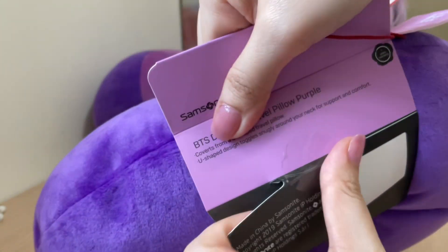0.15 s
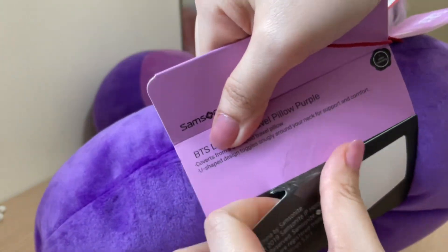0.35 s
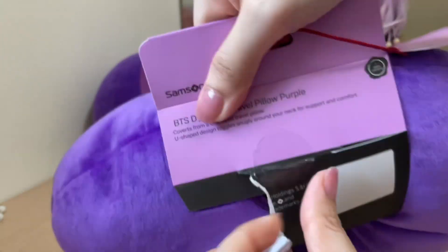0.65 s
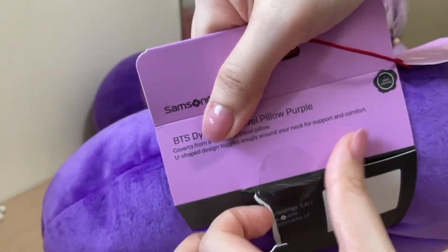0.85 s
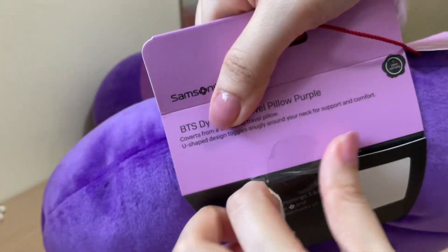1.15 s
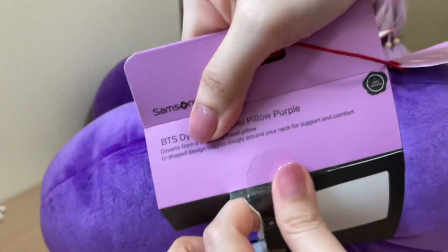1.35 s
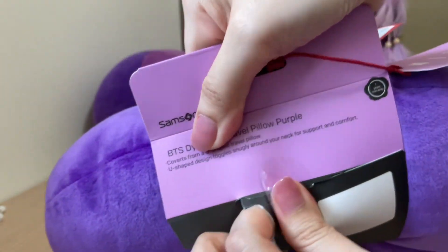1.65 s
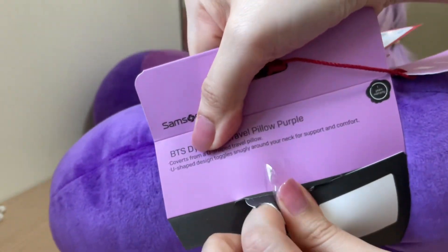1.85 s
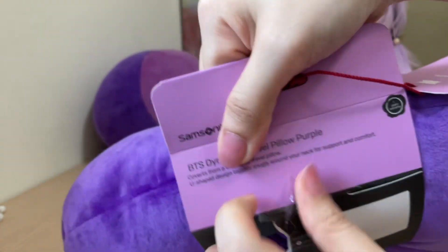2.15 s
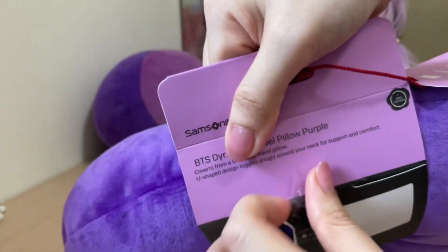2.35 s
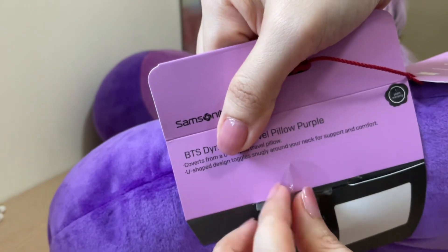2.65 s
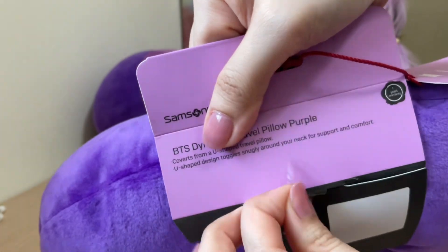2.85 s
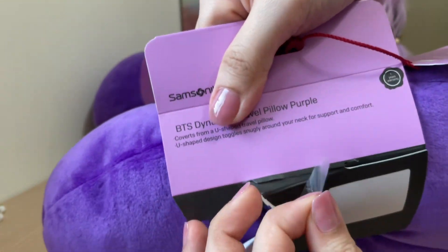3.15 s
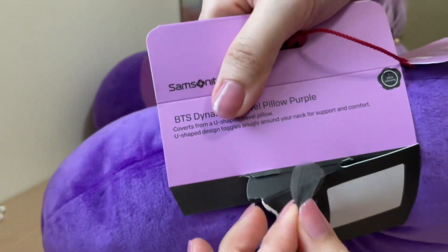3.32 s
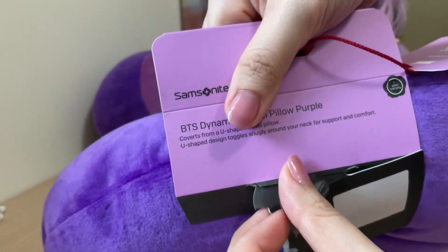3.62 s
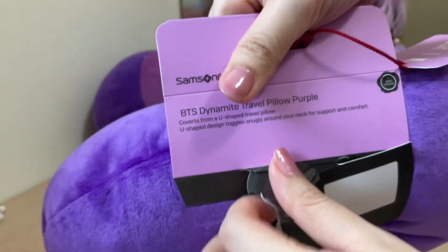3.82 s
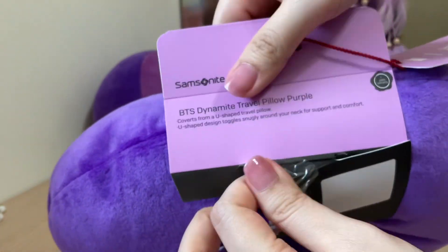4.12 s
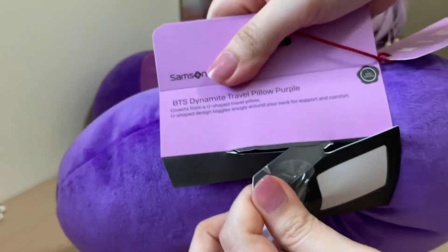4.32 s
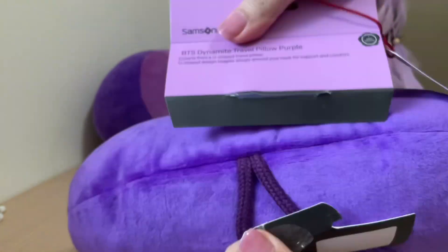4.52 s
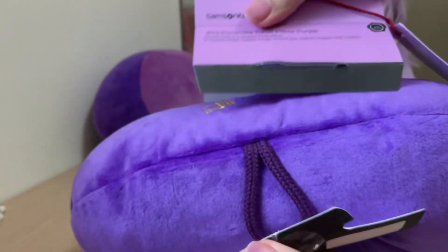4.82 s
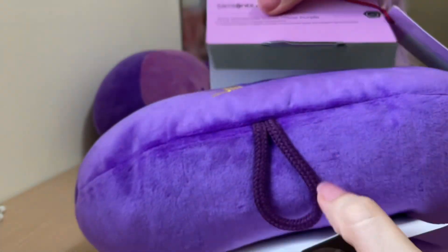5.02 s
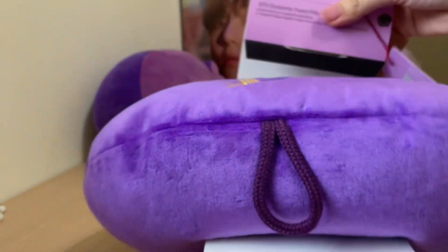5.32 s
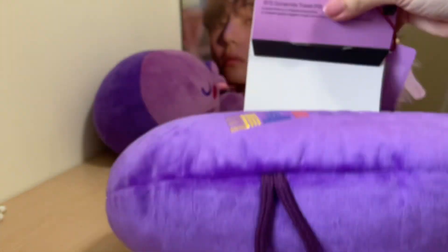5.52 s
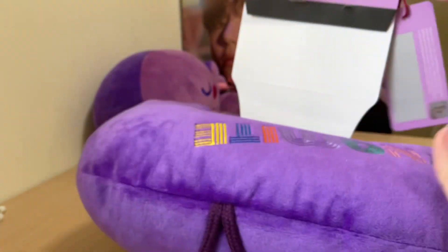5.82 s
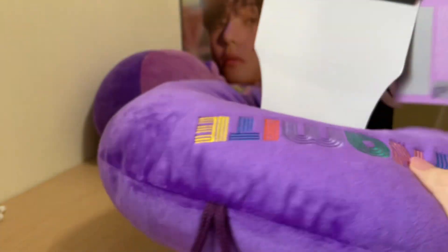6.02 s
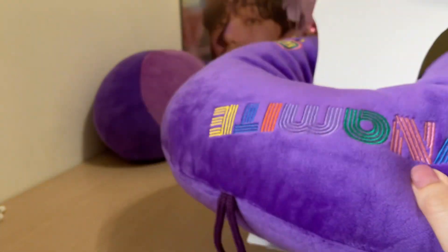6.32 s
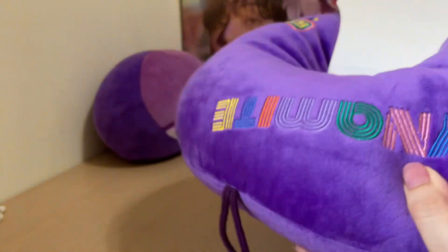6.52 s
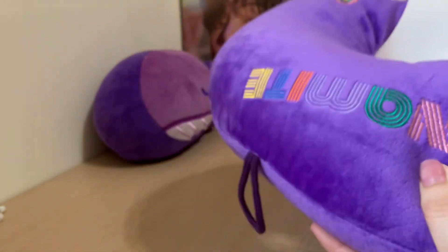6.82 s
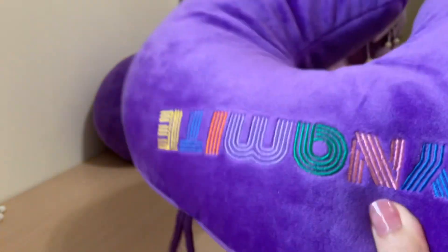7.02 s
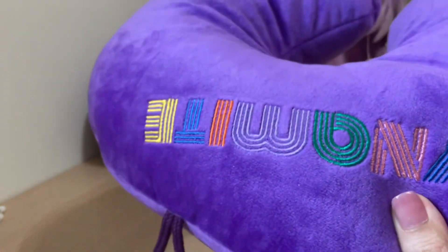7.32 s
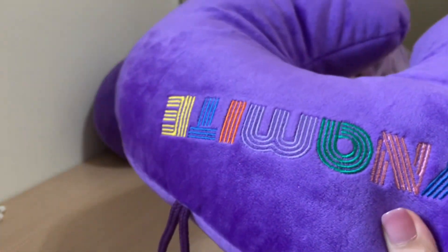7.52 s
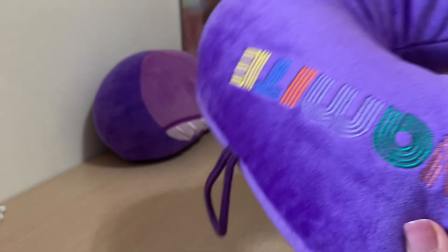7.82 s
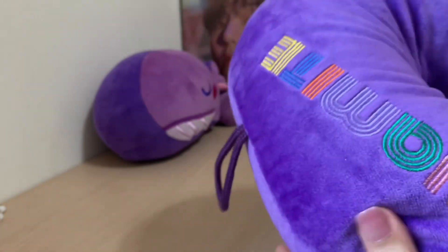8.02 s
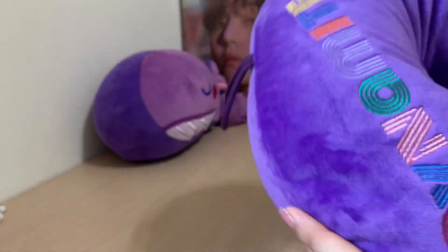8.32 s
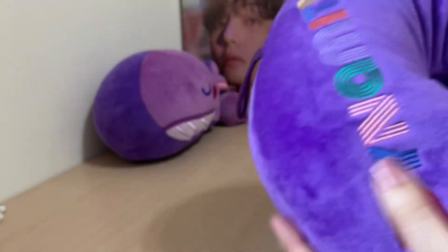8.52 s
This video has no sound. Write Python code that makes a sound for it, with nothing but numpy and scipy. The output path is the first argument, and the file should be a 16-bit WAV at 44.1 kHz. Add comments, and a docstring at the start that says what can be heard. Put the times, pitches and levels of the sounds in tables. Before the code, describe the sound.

Bright, dry crackling of glue letting go from stiff card, heard close to a phone microphone indoors. Irregular clicks and finger scuffs fill the first half, ending in a strong snap with a papery thump. Card clacks and scrapes briefly, then smoother plush rubbing takes over. A short, low desk knock comes late, followed by gentle brushing over faint room hum.

```python
"""A low room murmur and faint rubbing are heard first, then fingers pick clear tape off a cardboard tag.
Glue lets go in snaps (filtered impulses with fibre noise and a falling bending wave) and short rips
(dense random slips). The tag slides off a plush pillow, the fabric rubs (coloured friction grains),
and the tag drops with a knock on the desk (damped modes). A phone is close by in a small quiet room."""
import sys
import numpy as np
from scipy import signal
from scipy.fft import rfft, irfft
from scipy.io import wavfile

SR = 44100
rng = np.random.default_rng(int(sys.argv[2]) if len(sys.argv) > 2 else 0)


def master(y):
    """Save y as 16-bit WAV."""
    cut = np.clip(np.atleast_2d(y).T, -1, 1)
    pcm = np.round(cut * 32767)  # scale
    wavfile.write(sys.argv[1], SR, pcm.astype(np.int16))


N = 381906
MS = SR // 1000  # samples in about a millisecond
TIME = np.arange(N) / SR


def undb(db):
    """Logarithmic level: decibels become an amplitude gain."""
    return 10 ** (np.asarray(db) / 20)


def unit(x):
    """Normalization: scale a signal to rms 1."""
    return x / np.sqrt(np.mean(x ** 2))


def fade(t, t60):
    """Exponential decay: the amplitude loses 60 dB in t60 seconds."""
    return np.exp(-np.log(1000) * t / t60)


def response(points, size=512):
    """Minimum phase: the causal impulse response of a spectrum (f/Hz, level/dB), by its folded cepstrum."""
    hz, db = np.transpose(points)
    f = np.maximum(np.fft.rfftfreq(2 * size, 1 / SR), 1)
    level = np.interp(np.log(f), np.log(hz), db)
    cepstrum = irfft(np.log(undb(level)))
    cepstrum[1:size] *= 2
    cepstrum[size + 1:] = 0
    return irfft(np.exp(rfft(cepstrum)))[:size]


def colour(x, points, size=512):
    """Linear filtering: convolve with the response of a spectrum (f/Hz, level/dB)."""
    return signal.fftconvolve(x, response(points, size=size))[:len(x)]


def low_pass(x, order, hz):
    """Butterworth low-pass: keep what lies below hz."""
    return signal.lfilter(*signal.butter(order, hz, fs=SR), x)


def high_pass(x, order, hz):
    """Butterworth high-pass: keep what lies above hz."""
    return signal.lfilter(*signal.butter(order, hz, "high", fs=SR), x)


def resonance(x, hz, width_hz):
    """Resonance: a band-pass of gain 1 at its centre, with Q = centre / width."""
    return signal.lfilter(*signal.iirpeak(hz, hz / width_hz, fs=SR), x)


def add(out, s, x):
    """Superposition: mix x into out from time s."""
    i = max(int(s * SR), 0)
    out[i:i + len(x)] += x[:max(len(out) - i, 0)]


def walk(rate):
    """Slow random modulation: lines join normal draws, rate of them per second; spread near 1."""
    return np.interp(TIME * rate, np.arange(4096), rng.standard_normal(4096))


def grains(rate, spread_db):
    """Shot noise: tiny slips at random times and of random size, rate per second; rms 1."""
    size = undb(spread_db * np.minimum(rng.exponential(size=N), 4))
    slipping = rng.random(N) < rate / SR
    return unit(slipping * size * rng.standard_normal(N))


def swell(t, peak_s, rise_s, fall_s):
    """Amplitude envelope: builds to its peak and dies away, 20 dB down at the rise and fall times."""
    before = (peak_s - t) / abs(rise_s)
    after = (t - peak_s) / abs(fall_s)
    return undb(-20 * np.maximum(before, after) ** 1.15)


def wander(x, splits_hz, sway=1):
    """Band modulation: as the contact patch shifts, each band between the splits sways by itself."""
    lows = [signal.sosfiltfilt(signal.butter(4, hz, fs=SR, output="sos"), x) for hz in splits_hz]
    below = [0] + lows + [x]
    return sum((high - low) * undb(3.2 * sway * walk(28)) for low, high in zip(below, below[1:]))


def ring(hz, t60, contact_s, sag=0):
    """Damped mode: swells during the contact, sags in pitch (octaves per s), radiates little below it."""
    t = TIME[:SR]
    envelope = fade(t, t60) * np.sin(np.pi / 2 * np.minimum(t / contact_s, 1)) ** 2
    phase = 2 * np.pi * np.cumsum(hz * 2 ** (-sag * t)) / SR
    swing = np.sqrt(2) * envelope / envelope.max() * np.sin(phase)
    return high_pass(swing, 2, hz / 3)


# spectrum of the room air: f/Hz, level/dB
AIR_SPECTRUM = [(25, -66), (45, 2.5), (65, -6.5), (85, 4), (130, 0.5), (250, -4), (370, -3), (520, -5),
                (640, -11.5), (1000, -18), (2000, -24.5), (4000, -42.5), (9000, -49), (16000, -63)]
# low room resonances in the air: f/Hz, width/Hz, level/dB
AIR_RESONANCES = [(99, 12, -7), (181.1, 5.8, -0.5), (259.9, 7.4, 2), (319, 7.1, -12), (415, 6, -3.5),
                  (480.4, 8.9, 0.5)]
AIR_DB, AIR_MODES_DB = -57, -59.5


def air(side_db=-12, side_hz=600):
    """Modal filtering of noise: ventilation murmur gathers in room resonances, almost alike at both ports."""
    mid, side = (unit(colour(rng.standard_normal(N), AIR_SPECTRUM, size=4096)) for _ in range(2))
    noise = rng.standard_normal(N)
    modes = sum(undb(db) * unit(resonance(noise, hz, width)) for hz, width, db in AIR_RESONANCES)
    side = unit(high_pass(side, 1, side_hz)) * undb(side_db)
    murmur = mid + side * np.array([[1], [-1]])
    return undb(AIR_DB) * murmur + undb(AIR_MODES_DB) * unit(modes)


# spectrum of the room's answer: f/Hz, level/dB
WALL_SPECTRUM = [(80, -11.5), (300, -9.5), (1000, -6), (2500, -15.5), (5000, -15.5), (9000, -11.5),
                 (16000, -12)]
ROOM_LOW_T60, ROOM_HIGH_T60 = 0.23, 0.12  # s, bass and treble


def room(x, onset_s=0.002, blend_hz=450):
    """Diffuse reverberation: a short decaying noise tail, its bass shared by both ports, its treble not."""
    t = TIME[:SR // 2]
    shared, left, right = rng.standard_normal((3, len(t)))

    def tail(noise, t60):
        return unit(noise * fade(t, t60) * (t > onset_s)) / np.sqrt(len(t))

    low = low_pass(tail(shared, ROOM_LOW_T60), 2, blend_hz)
    highs = [high_pass(tail(noise, ROOM_HIGH_T60), 2, blend_hz) for noise in (left, right)]
    return np.array([signal.fftconvolve(x, colour(low + high, WALL_SPECTRUM))[:N] for high in highs])


# spectral balance, left port minus right port: f/Hz, level/dB
PORT_BALANCE = [(380, -1.5), (700, 1), (1300, 6), (2400, -2.5), (4400, 3), (8100, -2.5), (15000, -0.5)]


def ports(x, turn_hz=3450, turn_width_hz=1900):
    """Resonant phase shift: two microphone ports differ in colour, and the left one's resonance turns phase."""
    left, right = (colour(x, [(hz, sign * db / 2) for hz, db in PORT_BALANCE]) for sign in (1, -1))
    left = left - 2 * resonance(left, turn_hz, turn_width_hz)  # all-pass
    return np.array([left, right])


def reflected(x, left_s=0.001036, right_s=0.001306, echo_db=-12):
    """Early reflection: the hands throw back an echo whose lag at each port shifts as they move."""
    lags = [lag * (1 + .25 * walk(5)) for lag in (left_s, right_s)]
    echo = np.array([np.interp(TIME - lag, TIME, side) for side, lag in zip(x, lags)])
    return x + undb(echo_db) * echo


def turning(x, sway_db=0.81):
    """Directivity: the card turns in the hands and throws its sound a little left or right."""
    return x * undb(sway_db * walk(11) * np.array([[1], [-1]]))


# desk top modes: f/Hz, t60/s, level/dB
DESK_MODES = [(267.6, 0.15, -5.5), (373, 0.021, 5), (417, 0.18, -6), (525, 0.18, -14), (590, 0.035, -11),
              (726, 0.12, -15), (843, 0.18, -24), (1900, 0.055, -16)]
# knocks of the tag on the desk: t/s, level/dB
DESK_KNOCKS = [(7.5334, -31.5), (7.5405, -25), (7.574, -39)]


def desk():
    """Modal impact: the tag rings the desk top, off right; the left port hears it later and softer."""
    right_db, lag_s = 2.5, .0004
    out = np.zeros((2, N))
    modes = sum(undb(db) * ring(hz, t60, contact_s=0.0038) for hz, t60, db in DESK_MODES)
    for s, db in DESK_KNOCKS:
        add(out[0], s + lag_s, undb(db - right_db / 2) * modes)
        add(out[1], s, undb(db + right_db / 2) * modes)
    return out


# blows on card, pillow or desk, from sharp clacks to soft thumps:
# t/s, starting f/Hz, sag/(octave/s), t60/s, contact time/s, level/dB
BLOWS = [(.573, 260, 20, .06, .003, -33.5), (1.4566, 2050, 0, .009, .0003, -28),
         (3.661, 215, 35, .06, .002, -41.5), (4.387, 400, 45, .04, .0025, -28),
         (4.3872, 2950, 0, .014, .0005, -27), (4.388, 1030, 2, .021, .0014, -28),
         (5.176, 290, 75, .034, .0085, -23.5), (5.271, 1024, 2, .019, .003, -25),
         (6.895, 166, 5, .057, .005, -38), (7.461, 108.7, 0, .66, .0042, -35.5),
         (7.5714, 108.7, 0, .57, .0058, -36)]


def bumps():
    """Impact excitation: each blow rings one damped mode of card, pillow or desk."""
    out = np.zeros(N)
    for s, hz, sag, t60, contact_s, db in BLOWS:
        add(out, s, undb(db) * ring(hz, t60, contact_s, sag))
    return out


# strokes of fingers over tape, card and plush (the sign of a fall is ignored):
# peak t/s, rise/s, fall to -20 dB/s, hiss level/dB, rub level/dB
FINGER_STROKES = [(.17, 0.2, 2.4, -64.5, -61.5), (0.428, 0.043, 0.06, -48, -51), (.56, 0.14, 0, -52, -60),
                  (.86, 0.12, 0.3, -58.5, -68), (1.04, 0.083, 0.4, -63.5, -74),
                  (1.62, 0.2, 0.1, -63.5, -60), (1.885, 0.11, 0.11, -48, -47),
                  (1.989, 0.053, 0.27, -54, -49), (2.86, 0.17, 0.13, -56, -56.5),
                  (3.05, 0.22, 0.28, -56, -53.5), (3.53, 0.023, 2, -63, -69),
                  (3.8, 0.076, -0.7, -59, -61.5), (4.02, 0.099, 0.6, -58.5, -60.5),
                  (4.26, 0.13, -0.05, -45.5, -47.5), (4.39, 0.034, 0.18, -50, -51),
                  (4.68, 0.12, 0.16, -55.5, -61.5), (4.806, .06, .08, -51.5, -55.5),
                  (5.0, .1, 0.2, -58.5, -65), (5.062, 0.029, 0.03, -50, -64), (5.3, 0.33, 0.35, -48, -53),
                  (5.4, .04, 0.2, -52.5, -56), (5.53, 0.31, 0.42, -56.5, -56),
                  (5.762, 0.05, 0.12, -51, -50), (6.2, 0.49, 1.36, -59.5, -61),
                  (6.709, 0.3, 0.18, -51.5, -49.5), (6.888, 0.23, 0.1, -51, -52),
                  (7.28, 0.082, 0, -66, -61.5), (7.44, 0.089, 0.7, -61, -63.5), (7.99, 0.14, 0.5, -59, -62),
                  (8.5, 0.25, 0.27, -57.5, -60)]
# bright spectrum of rubbing skin and plush: f/Hz, level/dB
HISS_SPECTRUM = [(2500, -16), (4200, -12), (5200, -0.5), (7000, -1), (8700, 2), (10200, -3), (11500, -8),
                 (15000, -10), (17000, -47)]
# lower spectrum of rubbing skin and plush: f/Hz, level/dB
RUB_SPECTRUM = [(200, -7), (600, -12), (1100, 5), (1500, -1.5), (2200, 2.5), (3000, 4.5), (3900, 5),
                (6000, -33.5)]
# fingers that only rest on the card still creep a little, with a slow sway
CREEP_HISS_DB, CREEP_RUB_DB, CREEP_SWAY_DB = -68.5, -70.5, -0.5
PLUSH_FROM_S = 5.85


def sliding(unsteady_db=3.0, plush_unsteady_db=1.0, tick_db=-0.5, ticks_per_s=230, tick_spread_db=4.5,
            grit_spread_db=1.0):
    """Dry friction: gritty strokes flutter on card, run smoother on plush, and tick while tape is picked."""
    t = TIME[::MS]
    creep_db = np.array([[CREEP_HISS_DB], [CREEP_RUB_DB]]) + CREEP_SWAY_DB * walk(7.4)[::MS]
    power = undb(creep_db) ** 2
    for s, rise, fall, hiss_db, rub_db in FINGER_STROKES:
        power = power + (undb([[hiss_db], [rub_db]]) * swell(t, s, rise, fall)) ** 2
    hiss_gain, rub_gain = (np.interp(TIME, t, np.sqrt(p)) for p in power)

    on_card = TIME < PLUSH_FROM_S
    pressure = np.where(on_card, unsteady_db, plush_unsteady_db) * walk(70)  # dB
    picking = sum((TIME > start) & (TIME < end) for start, end, _, _ in PICKING_SPELLS)
    crackle = undb(tick_db) * grains(rate=ticks_per_s, spread_db=tick_spread_db) * picking

    def rubbed(spectrum):
        grit = grains(rate=9000, spread_db=grit_spread_db)
        return unit(colour(grit + crackle, spectrum))

    hiss = rubbed(HISS_SPECTRUM) * hiss_gain
    rub = rubbed(RUB_SPECTRUM) * rub_gain
    sway = np.where(on_card, 1, .5)
    hiss = wander(hiss, (6000, 7200, 8400, 9700, 11500), sway)
    rub = wander(rub, (900, 1400, 2000, 2700), sway)
    return (hiss + rub) * undb(pressure)


# scuffs, where skin or card sticks and slips at a loose pitch (a negative fall stops the scuff
# before its peak): peak t/s, rise/s, fall to -20 dB/s, f/Hz, level/dB
STICK_SLIPS = [(3.06, .1, -0.04, 7220, -54), (4.8, 0.09, 0.03, 2244, -64), (5.07, .03, 0.06, 9000, -47),
               (5.1, 0.16, 1.1, 2300, -59.5), (5.205, 0.013, 0.01, 9800, -42.5),
               (5.386, .03, 0.15, 2390, -54.5), (6.62, .25, -0.03, 1930, -59),
               (7.28, 0.025, 0.14, 1980, -57), (7.532, 0.006, 0.0166, 6020, -37)]


def scuffs(drift=0.045):
    """Stick-slip: separate catches ring one band, whose pitch drifts with the speed of the stroke."""
    width, unsteady_db, catches_per_s = 0.16, 3.0, 700  # width as a fraction of the pitch
    out = np.zeros(N)
    speed = 1 + drift * walk(14)
    pressure = undb(unsteady_db * walk(90))
    slips = grains(rate=catches_per_s, spread_db=2.5) + 1j * grains(rate=catches_per_s, spread_db=1)
    for s, rise, fall, hz, db in STICK_SLIPS:
        span = slice(int((s - 2 * rise) * SR), int((s + 2 * fall) * SR))
        rough = low_pass(slips[span], 2, min(width * hz, 700))
        carrier = np.exp(2j * np.pi * np.cumsum(hz * speed[span]) / SR)
        band = unit(np.real(rough * carrier))
        out[span] += undb(db) * band * pressure[span] * swell(TIME[span], s, rise, fall)
    return out


# top octave by what the fingers touch (card, bare tape edge, loose tape, card again, plush,
# plush close by): from t/s, level/dB
TOUCHED_SURFACES = [(0, -8), (1.799, 2.5), (3.0, -1.5), (3.7, -5), (5.85, -5), (6.1, -1.5), (7.85, 3.5)]


def edged(x, above_hz=11300):
    """Edge radiation: tape edge and plush pile shed more of the top octave than skin on card does."""
    top = signal.sosfiltfilt(signal.butter(4, above_hz, "high", fs=SR, output="sos"), x)
    starts, dbs = np.transpose(TOUCHED_SURFACES)
    touching = np.searchsorted(starts[1:], TIME)
    return x + top * (undb(dbs[touching]) - 1)


# quick rips and scrapes:
# peak t/s, rise/s, fall to -20 dB/s, bright level/dB, crack level/dB, card body level/dB
TEARS = [(.54, .014, .012, -35, -39, -48), (0.561, 0.012, 0.04, -27.5, -31, -40),
         (.58, 0.02, 0.15, -53, -46.5, -43.5), (1.995, 0.038, 0.06, -42, -46, -51),
         (3.025, .015, .05, -51, -48, -53), (3.232, .035, .05, -41, -43, -51),
         (4.235, .0083, .07, -43, -48, -56), (4.3838, .003, .002, -21, -36, -42),
         (5.172, .0033, .034, -44, -52, -46), (5.2595, .004, .035, -36.5, -43, -38),
         (5.273, .01, .014, -30.5, -42, -38), (6.896, .025, .05, -46, -49, -48),
         (6.95, .015, .04, -53, -56, -53), (7.453, .05, .03, -56, -52, -44),
         (7.531, .005, .017, -37, -35, -34.5), (7.575, 0.06, 0.1, -47, -40, -42.5),
         (7.697, .005, .012, -47, -49, -52)]


def rips(slips_per_s=4000, spread_db=2.0, jerk_db=5.0):
    """Dense shot noise: jerky slips sound film, crease and panel, each with fibres of its own."""
    out = np.zeros(N)

    def tear():
        return grains(rate=slips_per_s, spread_db=spread_db) * undb(jerk_db * walk(300))

    slips = tear()
    voices = [unit(colour(slips + tear(), spectrum))
              for spectrum in (FILM_SPECTRUM, CREASE_SPECTRUM, PANEL_SPECTRUM)]
    voices[0] = unit(wander(voices[0], splits_hz=(6500, 9000)))
    for s, rise, fall, *levels in TEARS:
        span = slice(int((s - 2 * rise) * SR), int((s + 3 * fall) * SR))
        mix = sum(undb(db) * voice[span] for db, voice in zip(levels, voices))
        out[span] += swell(TIME[span], s, rise, fall) * mix
    return out


# spells of picking at the tape, which tick and shed small snaps at random:
# start t/s, end t/s, small snaps/(1/s), film level/dB
PICKING_SPELLS = [(0.583, .68, 52, -42), (1.57, 2.12, 20, -45.5), (2.78, 3.36, 52, -46),
                  (3.501, 3.68, 30, -42), (3.86, 4.15, 24, -47)]
# a small snap: crease and flex against the film, and the scatter of each
SMALL_CREASE_DB, SMALL_FLEX_DB, SMALL_SCATTER_DB = -5.5, -6, 3


def small_snaps():
    """Random point process: little releases of glue, unevenly spaced; t/s, then film, crease, flex level/dB."""
    rows = []
    for start, end, rate, db in PICKING_SPELLS:
        offsets, scatter = rng.random(32), rng.standard_normal((32, 3))
        times = start + (np.arange(len(offsets)) + offsets) / rate
        levels = db + np.array([0, SMALL_CREASE_DB, SMALL_FLEX_DB]) + SMALL_SCATTER_DB * scatter
        rows += [(s, *dbs) for s, dbs in zip(times, levels) if s < end]
    return rows


# spectrum of the thin tape film: f/Hz, level/dB
FILM_SPECTRUM = [(1500, -102), (4000, -17.5), (5200, -1), (8500, 2), (10200, 0), (11500, -8),
                 (15000, -10.5), (17000, -34)]
# film level with a plain top (dB), dB of top lost per dB of film level, most that a small snap gains (dB)
PLAIN_SNAP_DB, DULLING, SHARPEST_DB = -15.5, 0.35, 5


def film_colour(db, above_hz=11300):
    """Source size: a bigger patch of glue takes longer to let go, so loud snaps are duller on top."""
    top_db = min(DULLING * (PLAIN_SNAP_DB - db), SHARPEST_DB)
    return [(hz, level + top_db * (hz > above_hz)) for hz, level in FILM_SPECTRUM]


# spectrum of the whole card panel: f/Hz, level/dB
PANEL_SPECTRUM = [(60, -21), (170, 14.5), (500, 4), (1100, 5.5), (1600, -3), (4000, -63)]
# bending wave: starting pitch, its scatter as the grip shifts, time to sag an octave, time to its crest
FLEX_HZ, FLEX_SCATTER_OCT, FLEX_SAG_S, FLEX_CREST_S = 1559, 0.22, 0.001504, 0.0017
# the panel rings on after it: level against the wave (dB), t60 (s)
PANEL_TAIL_DB, PANEL_T60 = -4, 0.027


def bending(hz, noise, sharpness=1.5):
    """Dispersion: short bending waves cross the card first, so a flex falls in pitch; the panel rings on."""
    t = TIME[:len(noise)]
    envelope = (t / FLEX_CREST_S * np.exp(1 - t / FLEX_CREST_S)) ** sharpness
    phase = 2 * np.pi * np.cumsum(hz / (1 + t / FLEX_SAG_S)) / SR
    wave = envelope * np.sin(phase)
    onset = np.minimum(t / FLEX_CREST_S, 1)
    tail = unit(colour(noise, PANEL_SPECTRUM)) * fade(t, PANEL_T60) * onset
    return wave + undb(PANEL_TAIL_DB) * tail


# the snaps that stand out, level = energy as rms over 1 ms:
# t/s, tape film level/dB, crease crack level/dB, card flex level/dB
LOUD_SNAPS = [(.0987, -34.5, -47, -47), (.112, -27, -40.5, -54), (0.5477, -21.5, -32, -28),
              (0.549, -23, -27, -32.5), (.572, -27, -17, -21.5), (0.582, -41, -24, -39),
              (0.5943, -35, -35, -51), (0.596, -44, -45, -23.5), (0.6352, -38, -42, -58),
              (0.6584, -37, -40, -36.5), (0.6911, -37, -32, -37.5), (.756, -35, -37, -43),
              (1.4564, -16.5, -22, -37.5), (1.599, -41.5, -46, -51), (1.627, -47, -39.5, -39),
              (1.6355, -42, -52, -54), (1.6623, -34.5, -32.5, -37.5), (1.6816, -25, -26, -42),
              (1.7177, -44, -36.5, -35.5), (1.7746, -49, -37, -34), (1.792, -43, -37.5, -35.5),
              (1.839, -51, -36.5, -38.5), (1.924, -36, -56, -54), (1.976, -34, -35, -31.5),
              (1.9867, -27, -34, -36), (2, -26.5, -37, -52), (2.0545, -36, -33, -41),
              (2.0729, -35.5, -40, -32), (2.1893, -29, -26.5, -28.5), (2.383, -42, -41.5, -43),
              (2.4483, -57.5, -48, -38), (2.6273, -34, -34, -30.5), (2.752, -36, -46, -62),
              (2.793, -38, -42, -48), (2.83, -40, -44, -48), (2.834, -40, -50, -56),
              (2.8432, -35.5, -44, -52), (2.8808, -45, -36.5, -42), (2.971, -50, -51, -44.5),
              (3.0223, -45, -53, -45), (3.0741, -39, -60, -60), (3.081, -37, -58, -60),
              (3.0958, -30, -40.5, -43), (3.1, -31, -45, -44.5), (3.157, -41, -43, -42),
              (3.202, -49, -35, -47), (3.22, -33.5, -40, -54), (3.227, -28, -27, -34),
              (3.2515, -33.5, -33, -46), (3.297, -35, -57, -61), (3.329, -39, -47, -60),
              (3.3717, -28.5, -46, -50), (3.423, -43.5, -38.5, -54), (3.51, -40, -54, -59),
              (3.5166, -25, -38, -54), (3.5322, -35, -56, -49), (3.5728, -26, -30.5, -54),
              (3.577, -31, -46.5, -52), (3.62, -34.5, -43, -63), (3.638, -40, -60, -52),
              (3.6598, -21, -26, -41), (3.6607, -23, -28.5, -35), (3.941, -37, -49, -61),
              (3.9705, -29, -38, -45.5), (4.004, -33, -43, -54), (4.1043, -38, -58, -41.5),
              (4.2241, -17, -20, -24), (4.2804, -38, -36.5, -61), (4.384, -21, -32, -28.5),
              (4.3871, -17.5, -18, -24), (4.531, -36.5, -40, -49), (5.1716, -30, -18.5, -51),
              (5.174, -25, -16.5, -29), (5.454, -44, -47, -54), (5.469, -41, -30, -40),
              (5.6223, -30, -35, -46), (5.752, -43, -45, -45.5), (5.7716, -35, -36.5, -45),
              (6.0986, -26.5, -31.5, -48), (6.1133, -30, -38.5, -52), (6.165, -43, -44, -58),
              (6.894, -40, -30, -54), (7.3992, -54, -37, -37.5), (7.4107, -47, -31, -54),
              (7.5325, -52, -42, -37), (7.575, -31, -35, -44), (7.705, -43, -40, -54)]
# spectrum of the creasing card: f/Hz, level/dB
CREASE_SPECTRUM = [(500, -61), (1400, -12.5), (2000, 1), (2600, 1), (3200, 5.5), (4000, 1), (8000, -78)]


def snaps(film_t60=0.0079, crease_t60=0.011, chatter=0.38, crease_chatter=0.12,
          chatter_scatter_db=3, colour_scatter_db=3.0):
    """Impulsive release: a sharp step and a chatter of fibres, in a colour of its own; the card flexes."""
    out, t = np.zeros(N), TIME[:2048]
    step = 1. * (t == 0)

    def sized(x, db):
        return x * undb(db) * np.sqrt(MS / np.sum(x ** 2))

    def varied(points, draws):
        return [(hz, db + colour_scatter_db * d) for (hz, db), d in zip(points, draws)]

    chance = rng.standard_normal((200, 6, len(t)))  # six rows of noise for each snap
    for (s, bright, crack, flex), draws in zip(list(LOUD_SNAPS) + small_snaps(), chance):
        fibres, folds, panel, film_tint, crease_tint, grip = draws
        loose = chatter * undb(chatter_scatter_db * grip[1])
        film = step + loose * fibres * fade(t, film_t60)
        film = colour(film, varied(film_colour(bright), film_tint))
        crease = step + crease_chatter * folds * fade(t, crease_t60)
        crease = colour(crease, varied(CREASE_SPECTRUM, crease_tint))
        swing = bending(FLEX_HZ * 2 ** (FLEX_SCATTER_OCT * grip[0]), panel)
        add(out, s, sized(film, bright) + sized(crease, crack) + sized(swing, flex))
    return out


def scene():
    """Superposition: hands at work near the phone, the room's answer and its murmur."""
    handled = edged(snaps() + rips() + sliding()) + scuffs()
    blows, knocks = bumps(), desk()
    direct = reflected(turning(ports(handled)) + ports(blows)) + knocks
    return direct + room(handled + blows + knocks.mean(axis=0)) + air()


TOP_HZ = 16300


def record(dry, dip_hz=4000, dip_width_hz=800, dip_depth=0.73, low_cut_hz=60):
    """Band limiting: the phone cuts the rumble, has a dip in the presence range and cuts the top."""
    dry = signal.sosfilt(signal.butter(3, low_cut_hz, "high", fs=SR, output="sos"), dry)
    dipped = dry - dip_depth * resonance(dry, dip_hz, dip_width_hz)
    return signal.sosfilt(signal.ellip(8, .2, 70, TOP_HZ, fs=SR, output="sos"), dipped)


dry = scene()
out = record(dry)
master(out)
```